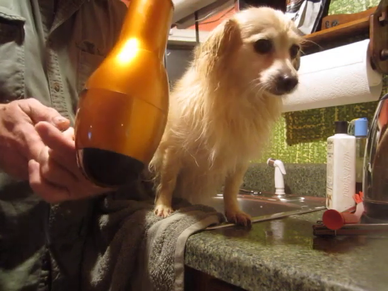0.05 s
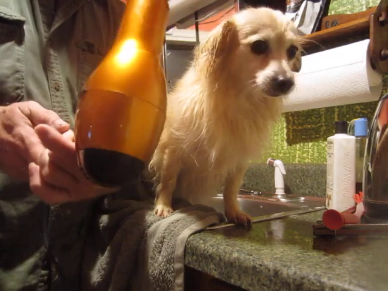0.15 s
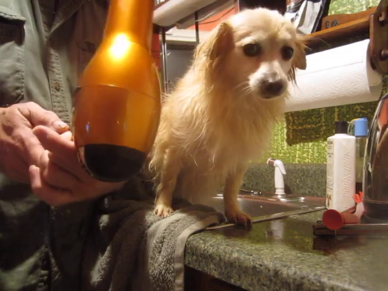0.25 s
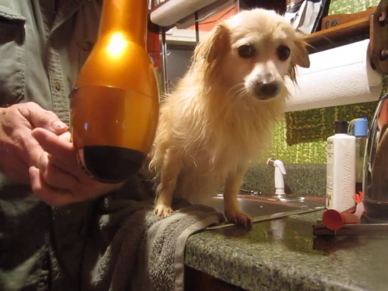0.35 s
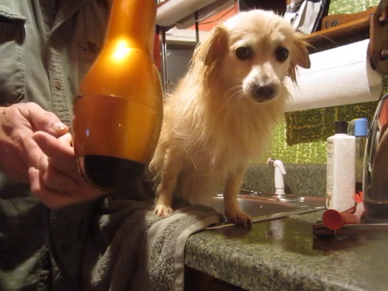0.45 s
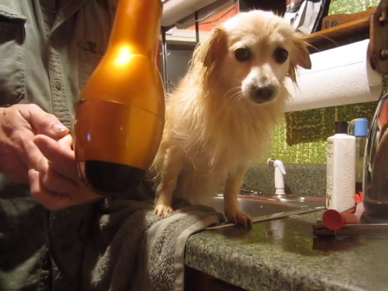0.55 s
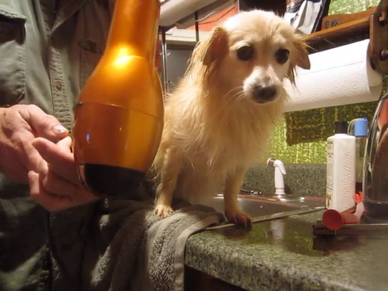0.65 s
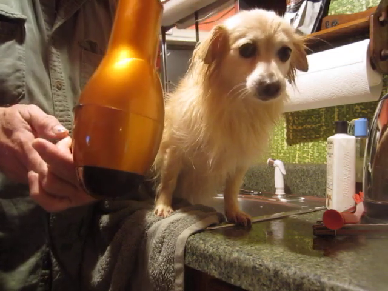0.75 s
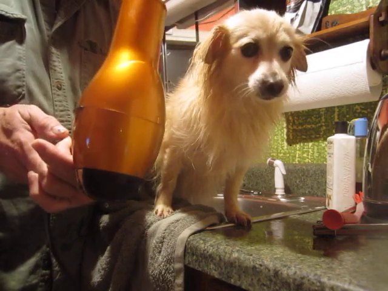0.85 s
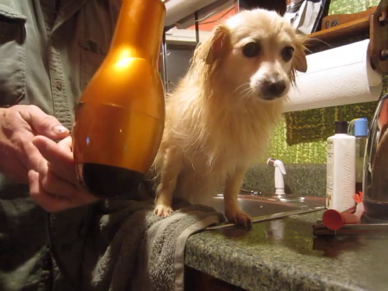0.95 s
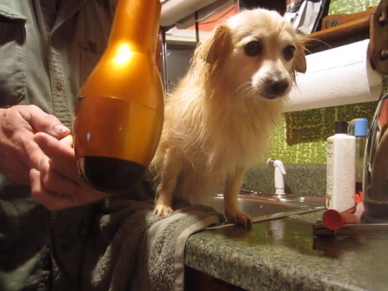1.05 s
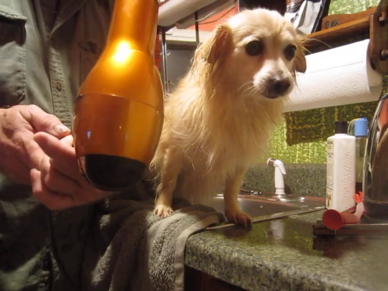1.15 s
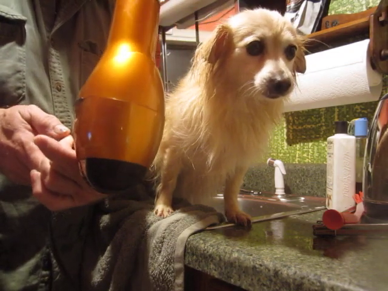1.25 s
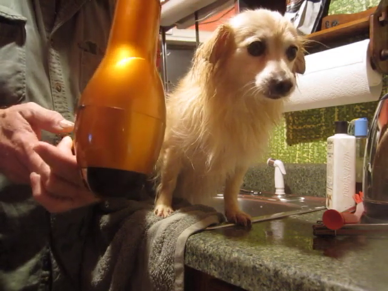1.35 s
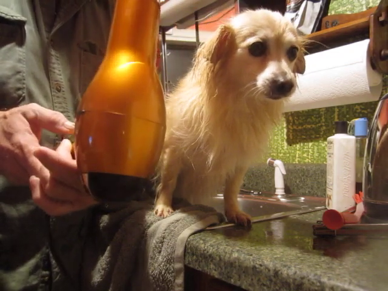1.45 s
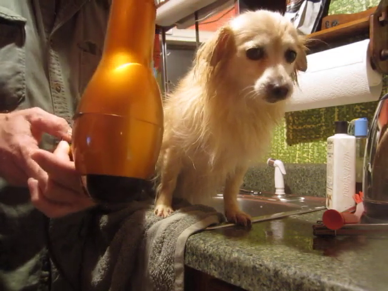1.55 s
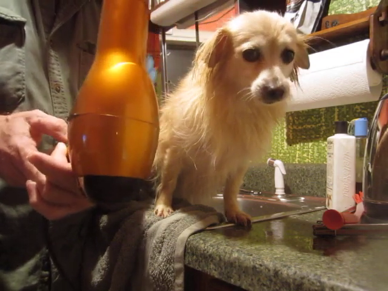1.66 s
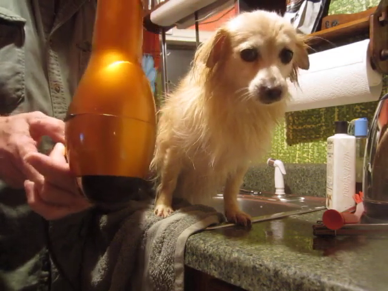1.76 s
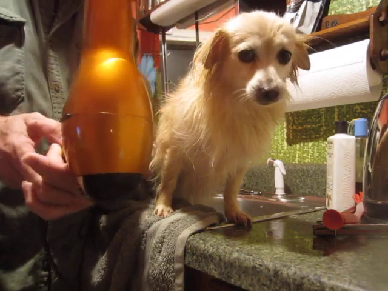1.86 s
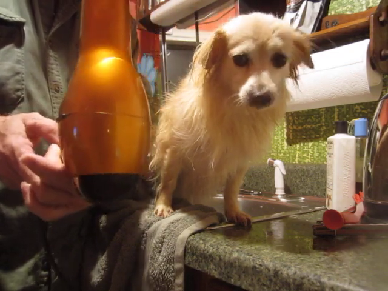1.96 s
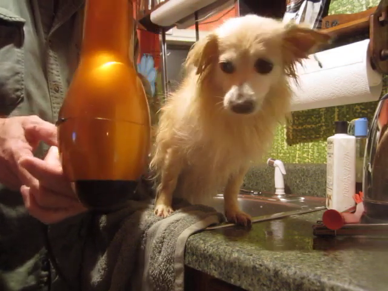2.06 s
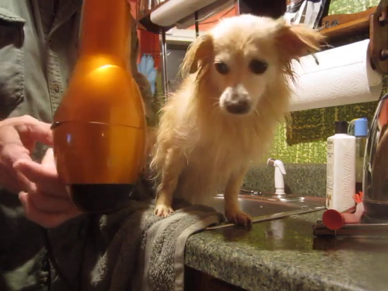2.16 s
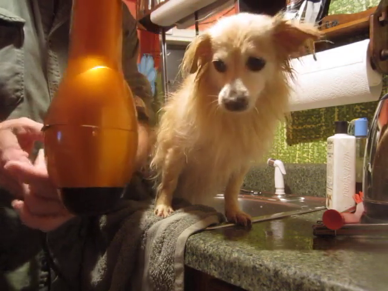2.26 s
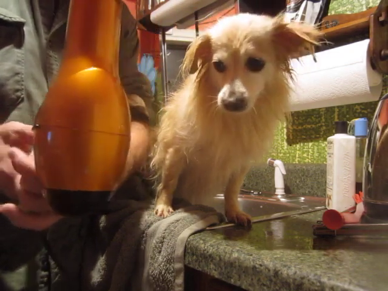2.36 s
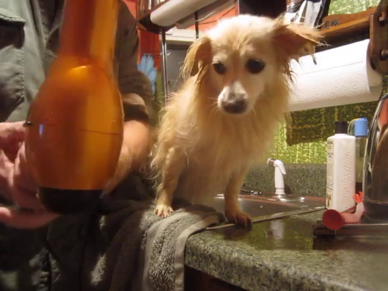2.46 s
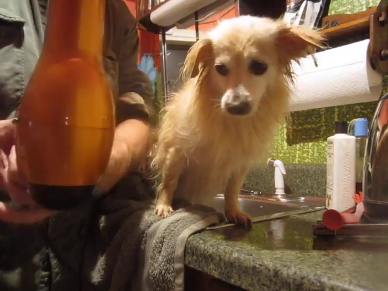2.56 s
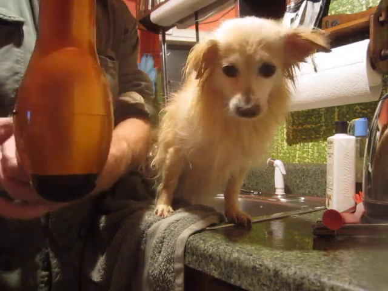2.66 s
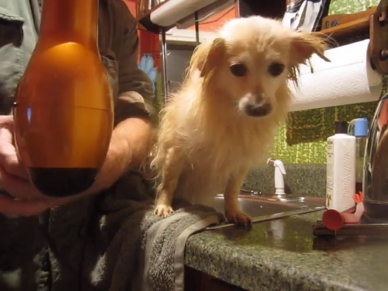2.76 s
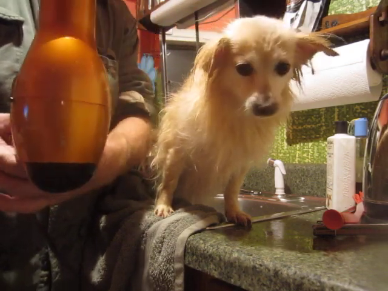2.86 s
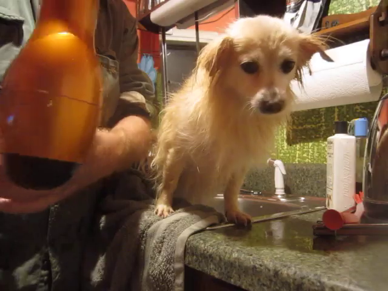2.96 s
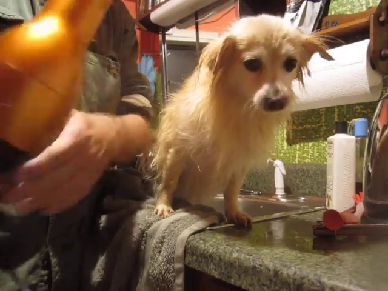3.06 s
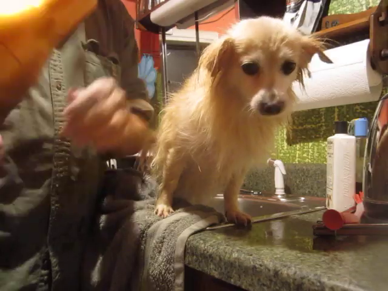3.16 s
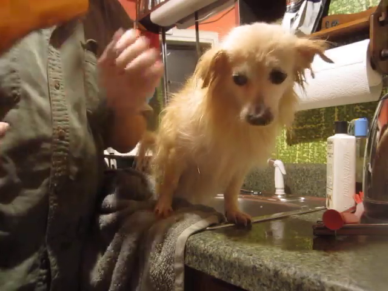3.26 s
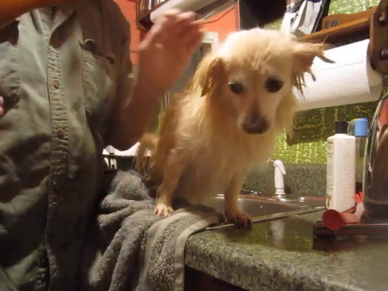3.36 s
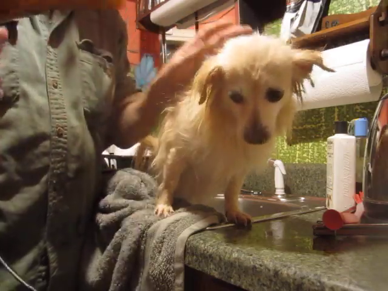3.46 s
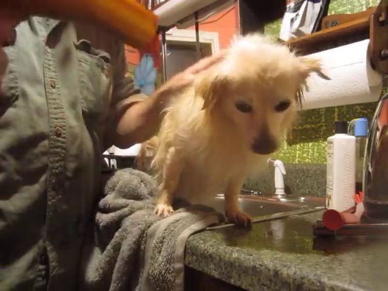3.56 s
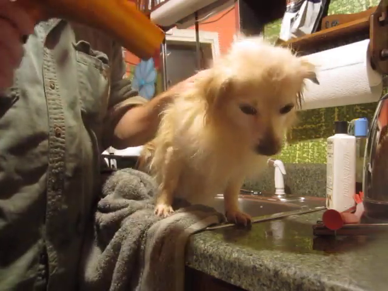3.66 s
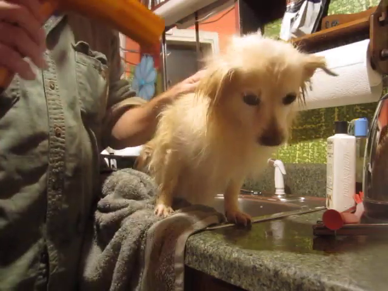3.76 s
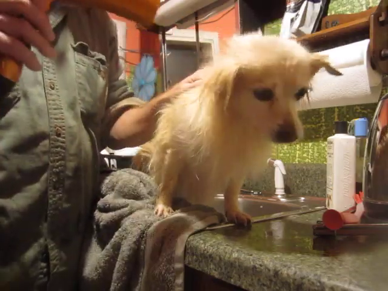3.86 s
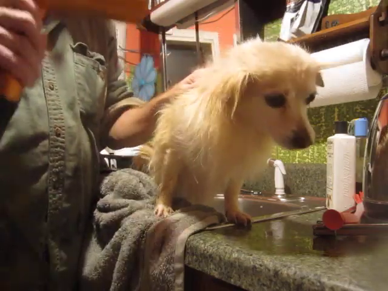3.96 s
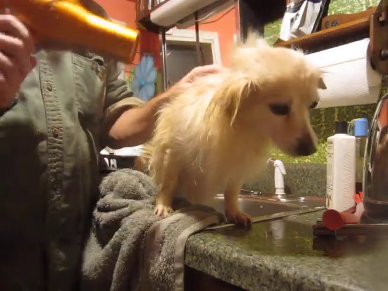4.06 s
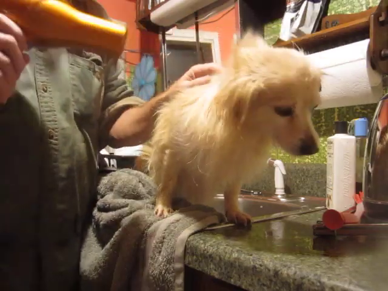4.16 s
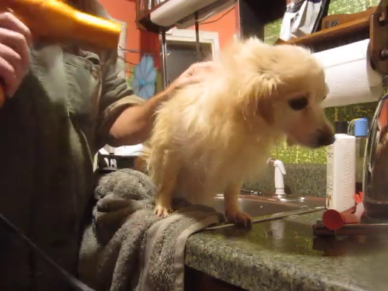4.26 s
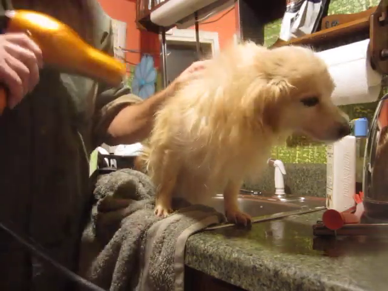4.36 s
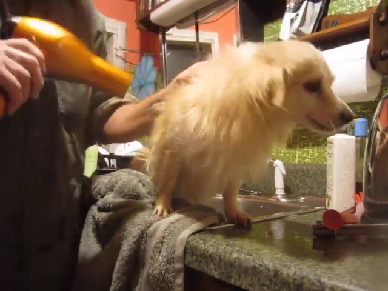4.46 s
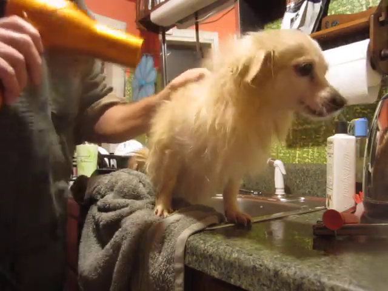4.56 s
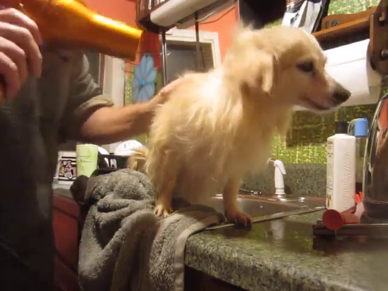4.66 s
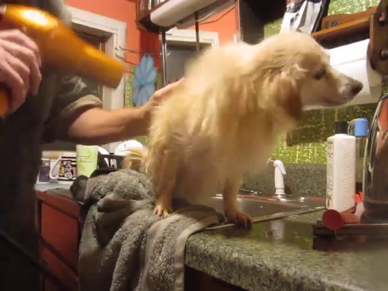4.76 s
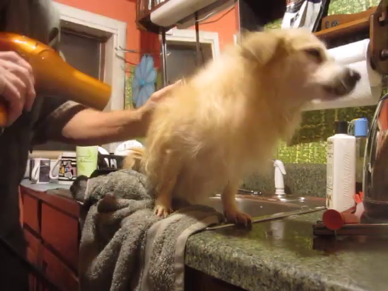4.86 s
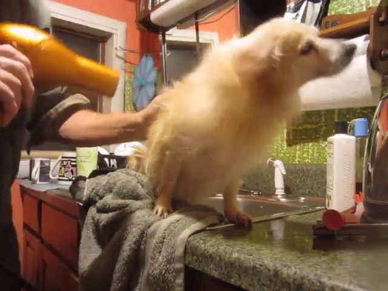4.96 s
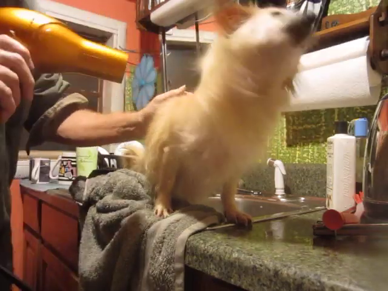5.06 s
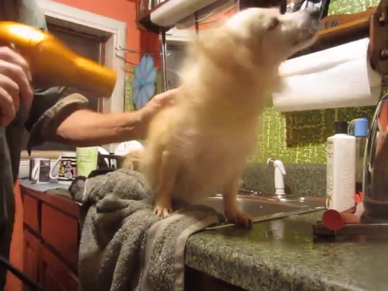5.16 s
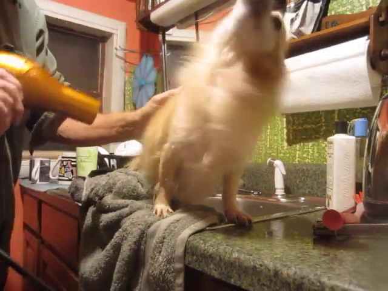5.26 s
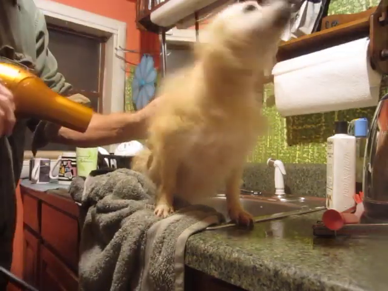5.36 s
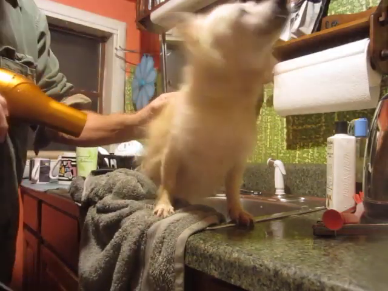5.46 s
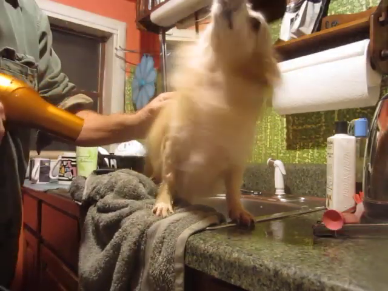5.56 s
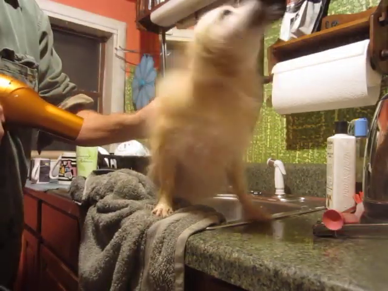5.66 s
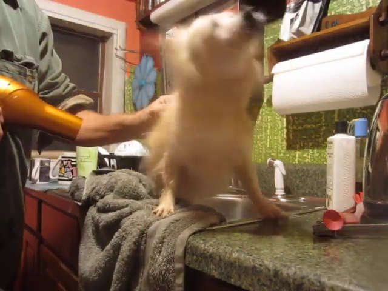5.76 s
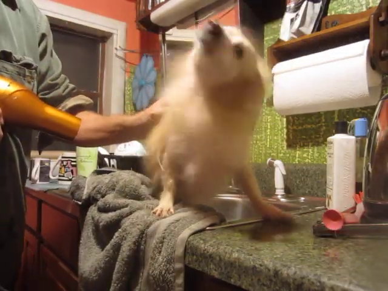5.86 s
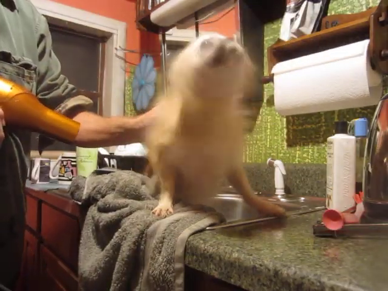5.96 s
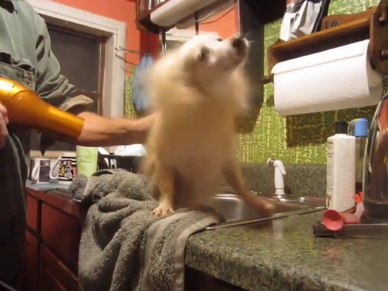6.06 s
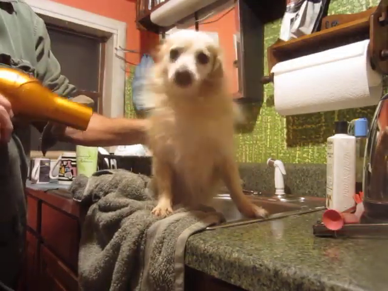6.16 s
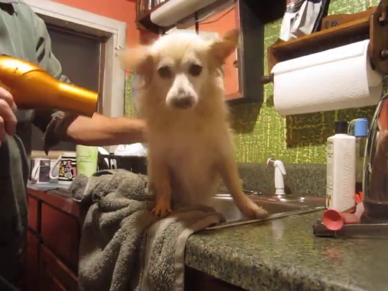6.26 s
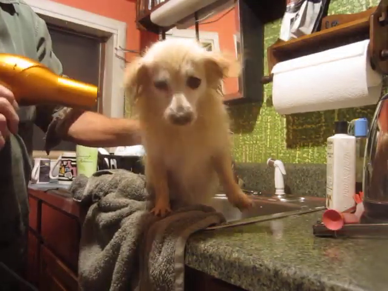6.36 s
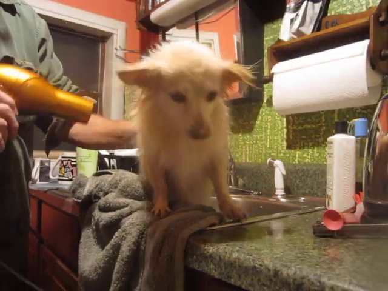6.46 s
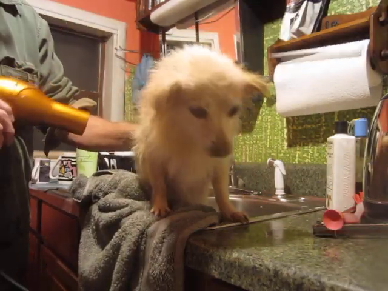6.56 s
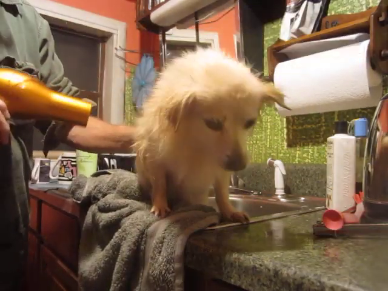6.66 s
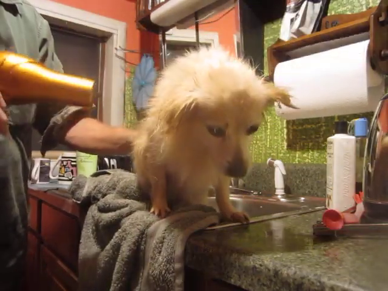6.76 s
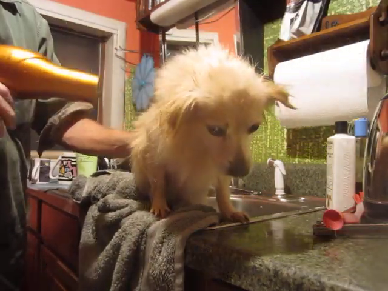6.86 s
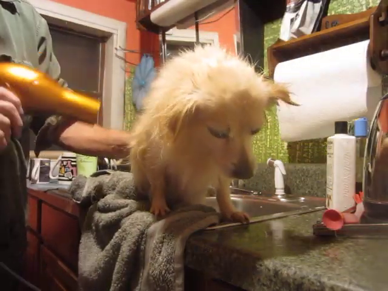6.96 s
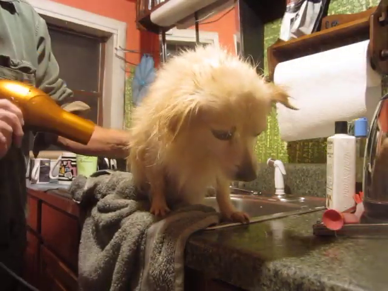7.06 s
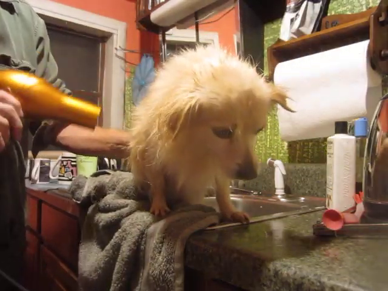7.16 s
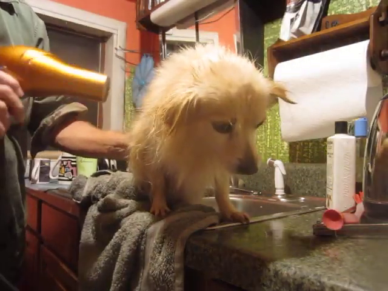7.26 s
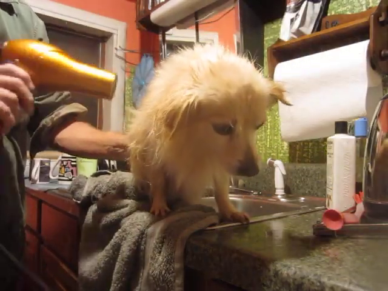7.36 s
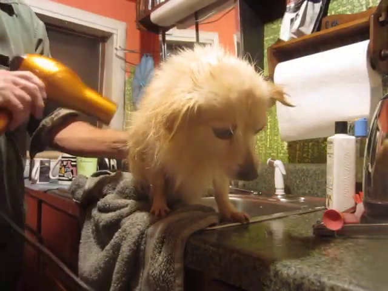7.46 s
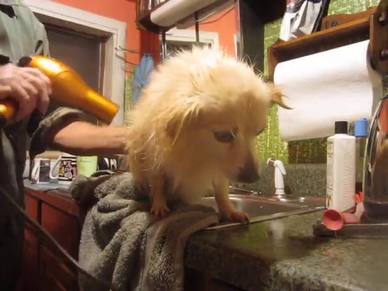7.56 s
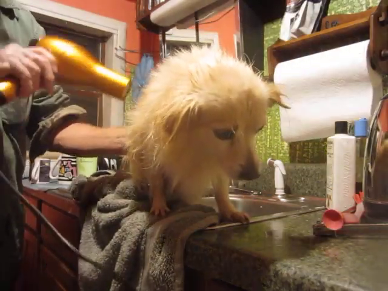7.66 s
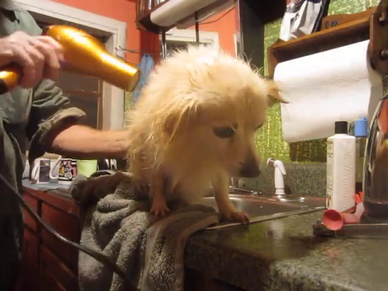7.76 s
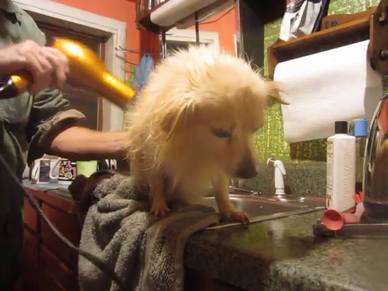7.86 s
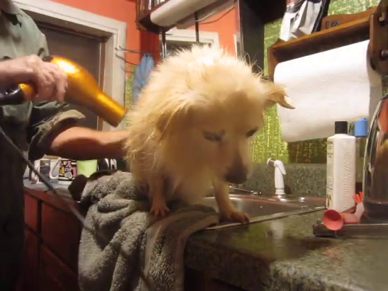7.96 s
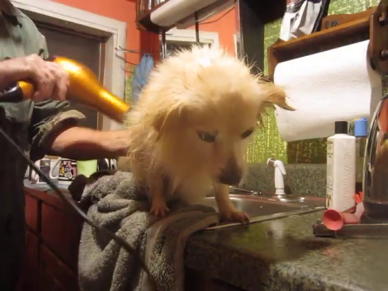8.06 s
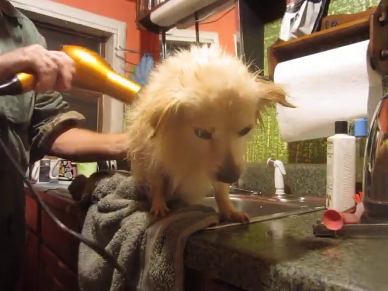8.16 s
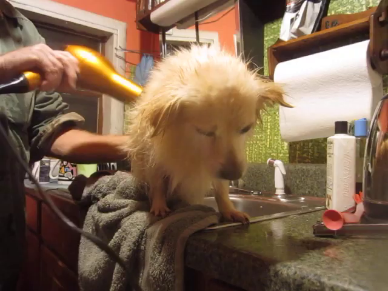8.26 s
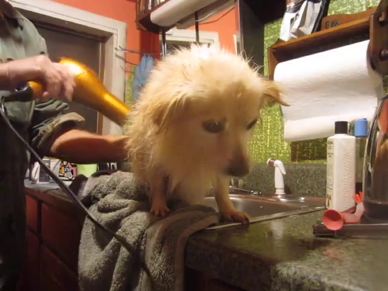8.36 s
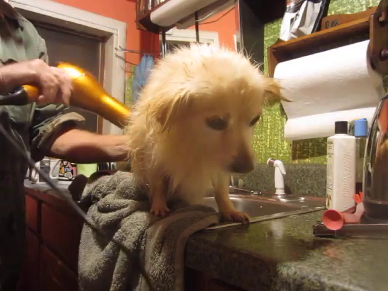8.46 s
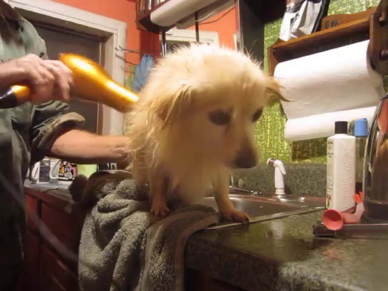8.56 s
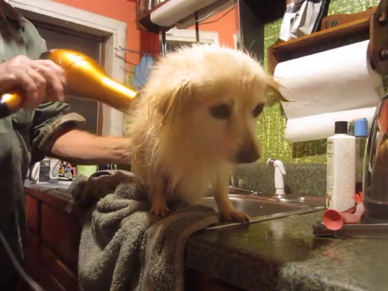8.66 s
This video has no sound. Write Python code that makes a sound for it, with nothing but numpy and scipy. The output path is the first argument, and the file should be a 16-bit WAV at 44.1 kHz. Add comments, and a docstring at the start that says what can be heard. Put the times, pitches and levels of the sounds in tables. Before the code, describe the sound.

A faint appliance hum fills a kitchen for about two seconds. A plastic switch snaps, and a hair dryer close to the microphone starts with a brief buzz and a quickly rising whine. It then runs to the end with a loud, hissing rush of air. The high whine swells and fades, and the roar and a hollow whistle pulse gently as the dryer sweeps over a dog.

```python
"""Drying a wet dog on the kitchen counter

A hair dryer, 0.3 to 0.6 m from the microphone: its switch snaps, the motor buzzes at twice the mains
rate and spins up to a fan whine. Air rushes from the barrel and hoots at the nozzle as it sweeps the dog.
Behind it the kitchen hums and sings faintly, sinking under the camera's gain control as the roar swells."""
import sys
import numpy as np
from scipy import signal
from scipy.fft import rfft, irfft, next_fast_len
from scipy.io import wavfile
from scipy.ndimage import uniform_filter1d, map_coordinates

SR = 44100
rng = np.random.default_rng(int(sys.argv[2]) if len(sys.argv) > 2 else 0)


def transcribe(u):
    """Save the signal u as a 16-bit wav file named by the first command-line argument.

    u: samples, shape (n,) or (channels, n), limited to [-1, 1]; the rate is SR.
    q: integer samples, one column per channel.
    """
    v = np.clip(np.atleast_2d(u).T, -1, 1)
    q = np.round(v * 32767).astype(np.int16)
    wavfile.write(sys.argv[1], SR, q)


N = 384507

POWER_S, TOP_SPEED_HZ = 1.8704, 291.33  # current reaches the motor; full shaft speed
# the dryer is held upright near the microphone, then levelled and drawn back:
# (time [s], distance [m], aim [0 upright, 1 level])
HAND = [(1.9, 0.48, 0.15), (2.4, 0.34, 0), (2.8, 0.39, 0.07), (3.3, 0.32, .02), (3.75, 0.29, 0),
        (4.1, 0.47, 0.05), (5.0, 0.52, 0.48), (5.5, 0.54, 0.8), (6.3, 0.54, 0.93), (7.3, 0.54, 0.8),
        (7.8, 0.58, 0.65), (8.72, 0.5, 0.5)]
# lobes of the fan's whine swing past the microphone:
# (time [s], length [s], blade tone gain [dB], sideband gain [dB], octave gain [dB])
LOBES = [(2.45, 0.52, 9, 4, 4), (2.97, 0.52, 14.5, 8.5, -12), (3.55, 0.13, 6.5, -6, -2),
         (4.2, .25, -7, 11, 1), (4.7, .18, -2, 12, -1), (5.12, .24, 11, 11, -4), (6.37, 0.13, 2, -5, 9),
         (7.72, 0.28, 5, 11, 0), (8.28, 0.23, 11, 6, 3), (8.61, .1, 9, 2, 0)]


def amp(db):
    """Decibels to gain."""
    return 10 ** (np.asarray(db) / 20)


def unit(x):
    """x at rms 1."""
    return x / np.sqrt(np.mean(x ** 2) + 1e-20)


def seconds():
    """The time of every sample."""
    return np.arange(N) / SR


def ramp(start, length):
    """0 before the start, 1 once the length has passed."""
    return np.clip((seconds() - start) / length, 0, 1)


def curves(rows):
    """One value per sample for each column after the time."""
    times, *columns = np.transpose(rows)
    return [np.interp(seconds(), times, column) for column in columns]


def swells(rows):
    """A bell of the given length at half height for each event; one sum per gain column."""
    times, lengths, *gains = np.transpose(rows)
    bells = 0.5 ** ((2 * (seconds() - times[:, None]) / lengths[:, None]) ** 2)
    return np.array(gains) @ bells


def wobble(rate):
    """A smooth random curve, rate knots a second."""
    knots = rng.standard_normal(int(N * rate / SR) + 4)
    grid = np.arange(0, len(knots) - 1, 1 / 16)
    return np.interp(seconds() * rate, grid, map_coordinates(knots, [grid]))


def lagged(x, lag_s):
    """x followed with a time constant."""
    keep = np.exp(-1 / (lag_s * SR))
    return signal.lfilter([1 - keep], [1, -keep], x)


def filtered(x, response):
    """x through a gain that depends on frequency."""
    size = next_fast_len(N + 8192)
    return irfft(rfft(x, size) * response(np.fft.rfftfreq(size, 1 / SR)), size)[..., :N]


def noise(spectrum):
    """Noise of rms 1 coloured by (frequency [Hz], density [dB]) points."""
    hz, db = np.transpose(spectrum)
    colour = lambda f: amp(np.interp(np.log(f + 1), np.log(hz), db))
    return unit(filtered(rng.standard_normal(N), colour))


def phase(hz):
    """Running angle of a gliding frequency."""
    return 2 * np.pi * np.cumsum(hz) / SR


def kitchen(hum_db=1.2, singing_db=0.7, room_db=-46.5):
    """The room tone: appliance hum, a wavering high singing and soft noise."""
    hum_tones = [(59.2, -55.5), (107.7, -53.5), (215.3, -57.5), (279.9, -52.5), (387.6, -58), (538.3, -65),
                 (699.8, -68), (769.8, -66), (818.3, -66.5), (1588, -67)]  # appliances: (frequency [Hz], relative level [dB])
    peaks = [(3466, 56, -57), (3660, 59, -56.5), (4260, 25, -65.5), (4740, 200, -70), (4974, 30, -73),
             (5940, 85, -63.5), (7068, 50, -67), (8010, 79, -62.5), (8100, 140, -61.5), (9200, 100, -83),
             (10430, 150, -77)]  # high singing: (frequency [Hz], width [Hz], relative level [dB])
    room_colour = [(15, -12), (50, -13), (100, -2.5), (150, -11.5), (190, 2), (245, -8), (350, -2),
                   (470, -4.5), (600, -8), (1400, -18.5), (2400, -24), (3500, -19), (5500, -26),
                   (8200, -26.5), (11500, -37.5), (15700, -42)]  # noise floor: (frequency [Hz], density [dB])
    hum = np.zeros(N)
    for hz, db in hum_tones:
        gain = np.sqrt(2) * amp(db + 1.4 * wobble(4))
        hum += gain * np.sin(2 * np.pi * (hz * seconds() + rng.uniform()))
    resonances = lambda f: np.sqrt(sum(amp(2 * db) / width / (1 + (2 * (f - hz) / width) ** 2) ** 2
                                       for hz, width, db in peaks))
    singing = np.sqrt(2 * SR / np.pi) * filtered(rng.standard_normal(N), resonances)
    return amp(hum_db) * hum + amp(singing_db) * singing + amp(room_db) * noise(room_colour)


def switch(t60=0.0058, room_db=-19, room_t60=0.18, ring_hz=2950, ring_t60=0.0065):
    """Plastic snaps that ring the rocker, each with a short answer from the kitchen."""
    contacts = [(1.8526, -13.5), (1.875, -15.5), (1.8778, -15), (1.8825, -28)]  # snaps: (time [s], relative level [dB])
    snap_colour = [(200, -25), (900, -7), (1700, -2), (2200, -13), (2900, 5), (3700, -5), (5000, -7),
                   (6500, -6), (8000, -6), (12000, -15), (16000, -25)]  # struck plastic: (frequency [Hz], density [dB])
    out = np.zeros(N)
    for start, db in contacts:
        t = np.maximum(seconds() - start, 0)
        attack = 1 - np.exp(-t / 0.00053)
        decay = amp(-60 * t / t60) + amp(room_db - 60 * t / room_t60)
        ring = amp(-60 * t / ring_t60) * np.sin(2 * np.pi * ring_hz * t)
        out += amp(db) * (amp(4) * attack * decay * noise(snap_colour) + ring)
    return out


def starting_buzz(level_db=-22, mains_hz=60, rise_s=0.045, hold_s=0.34, fall_db_per_s=60):
    """Each half wave of the mains jolts the housing; the buzz fades after a short hold."""
    housing_colour = [(150, -41), (380, -15), (560, 7), (750, 0), (1000, -7), (1600, -2), (1900, -11),
                      (2150, -2.5), (2700, -7), (3600, -17), (8000, -17), (16000, -46)]  # jolted shell: (frequency [Hz], density [dB])
    t = seconds() - POWER_S
    since_jolt = t % (0.5 / mains_hz)
    jolts = unit(np.exp(-since_jolt / 0.0029) * (1 - np.exp(-since_jolt / 0.0021)))
    rise_db = -6 * (1 - ramp(POWER_S, rise_s))
    fall_db = fall_db_per_s * np.maximum(t - hold_s, 0)
    return (t > 0) * amp(level_db + rise_db - fall_db) * jolts * noise(housing_colour)


def shaft_speed(start_s=1.8404, spin_up_s=0.13475, creep_hz=5.75, creep_s=3.42):
    """Turns per second: the motor spins up from rest, then creeps a little faster as it warms."""
    t = np.maximum(seconds() - start_s, 0)
    spin_up = TOP_SPEED_HZ * (1 - np.exp(-t / spin_up_s))
    return np.maximum(spin_up - creep_hz * np.exp(-t / creep_s), 1)


def whoop(speed, per_turn=3.12, resonance_hz=600, width_hz=85, level_db=-17, jitter=0.056):
    """A short, rough rising tone as the rotor's vibration sweeps through the housing's resonance."""
    hz = per_turn * speed
    response = 1 / (1 + ((hz - resonance_hz) / width_hz) ** 4)
    rough_gain = np.sqrt(2) * amp(level_db + wobble(120))
    return response * rough_gain * np.sin(phase(hz * (1 + jitter * wobble(200))))


def blown(flow, level_db, power, turned_db, turn_s=3.4, turn_length_s=0.76):
    """Gain of an air sound: a power of the flow, changed once the nozzle has turned onto the dog."""
    return flow ** power * amp(level_db + turned_db * ramp(turn_s, turn_length_s))


def fan(speed, flow, flutter_db=0.75, drift_db=1.0):
    """Nine blades on an unbalanced shaft; turbulence flutters each tone, and the high ones are beamed."""
    orders = [1, 9, 10, 18]  # imbalance, blade tone, upper sideband, octave: [cycles per turn]
    laws = [(-34, 9.1, 0.5), (-29, 0.37, 0), (-34, 3, -2.5), (-33, 1.5, -1)]  # each tone's strength: (level [dB], power of the flow, change on turning [dB])
    angle = phase(speed * (1 + 0.0011 * wobble(30) + 0.000592 * wobble(2)))
    tones = []
    for order, law, beam_db in zip(orders, laws, [0, *swells(LOBES)]):
        waver = amp(beam_db + flutter_db * wobble(22) + drift_db * wobble(3.9))
        tones.append(blown(flow, *law) * waver * np.sin(order * angle))
    tones[1] *= amp(np.interp(speed, [240, 284], [3, 0]))  # stronger while straining against slow air
    bite = np.minimum(speed / 200, 1) ** 4  # slow blades hardly sound
    return np.sqrt(2) * bite * sum(tones)


def hoot(flow, sweep_db, width_hz=17):
    """The jet rings a narrow hoot that rises with the flow and wanders between about 840 and 1000 Hz."""
    pitches = [(2.7, 840), (3.1, 940), (3.85, 942), (4.45, 996), (4.95, 986), (5.2, 897), (7.38, 901),
               (7.55, 988), (8.72, 1003)]  # nozzle resonance: (time [s], pitch at full speed [Hz])
    angle = phase(flow * curves(pitches)[0])
    turbulence = filtered(rng.standard_normal((2, N)), lambda f: 1 / (1 + (f / width_hz) ** 2))
    tone = unit(turbulence[0] * np.cos(angle) + turbulence[1] * np.sin(angle))
    return blown(flow, level_db=-23.5, power=3.7, turned_db=1) * amp(sweep_db) * tone


def patchy(x, depth_db):
    """The colour shifts in soft patches, several hundred Hz wide and a few tenths of a second long."""
    spectra = signal.stft(x, nperseg=512)[2]
    patches = rng.standard_normal(spectra.shape)
    for _ in range(2):
        patches = uniform_filter1d(uniform_filter1d(patches, size=7, axis=0), size=36, axis=1)
    return signal.istft(spectra * amp(depth_db * unit(patches)), nperseg=512)[1][:N]


def reflected(x, share, sway_ms):
    """Counter and cupboards send the microphone copies whose delays drift as the hand moves."""
    paths_ms = [.9, 2.3, 3.7, 6.1]  # reflections: extra travel time [ms]
    n = np.arange(N)
    copies = [np.interp(n - (ms + sway_ms * wobble(1.5)) * SR / 1000, n, x) for ms in paths_ms]
    return (x + share * sum(copies)) / np.sqrt(1 + len(copies) * share ** 2)


def air(flow, sweep_db, fur_share=0.73, dip_share=0.29, swish_share=0.73):
    """The stream roars, rushes, hisses and ruffles the fur; the treble dips as sweeps swell the roar."""
    # colours of the stream, all (frequency [Hz], density [dB])
    upright_colour = [(200, -63), (390, -11.5), (460, -10.5), (520, -3.5), (620, 1.5), (730, 3),
                      (800, -1.5), (960, 2), (1080, -2.5), (1180, 0.5), (1350, -13), (1800, -10.5),
                      (3000, -46)]  # barrel held upright
    aimed_colour = [(200, -41), (380, -16), (440, 0.5), (500, -4.5), (570, -5), (630, -1), (730, 1),
                    (810, -3), (960, 2.5), (1200, 0), (1310, -5.5), (1420, -3.5), (1800, -13.5),
                    (3000, -35)]  # barrel levelled at the dog
    fur_colour = [(30, -20), (120, -13.5), (200, -1), (330, 3), (420, 0.5), (700, -28), (1500, -70)]  # jet on the coat
    rush_colour = [(700, -50), (1300, 0), (1600, 0), (1900, -1), (2250, 1), (2480, -2), (2850, 0),
                   (3300, 0), (3700, -2.5), (4400, -5.5), (5200, -13.5), (8000, -61)]  # grille
    hiss_colour = [(3000, -48), (4400, -2.5), (5000, -3.5), (5700, -1), (6600, -1.5), (7400, -3.5),
                   (8200, -5), (9500, -19.5), (13000, -45)]  # treble
    fizz_colour = [(6000, -40), (7800, -3.5), (9000, 1), (11000, -.5), (12200, -3.5), (13300, -5.5),
                   (15100, -14.5), (15700, -13)]  # top octave
    swish_colour = [(4500, -38), (5900, -5), (6500, 0), (7100, -7), (9000, -40)]  # edge of the intake
    aim = np.clip(curves(HAND)[1], 0, 1)
    barrel = np.sqrt(1 - aim) * noise(upright_colour) + np.sqrt(aim) * noise(aimed_colour)
    fur = blown(flow, level_db=-38, power=2.1, turned_db=5) * noise(fur_colour)
    fur *= amp(fur_share * sweep_db)
    roar = blown(flow, level_db=-12, power=2.6, turned_db=-2) * barrel
    roar *= amp(sweep_db + 0.35 * wobble(25))
    rush = blown(flow, level_db=-14, power=2.3, turned_db=0.28) * noise(rush_colour)
    hiss = blown(flow, level_db=-19, power=2.7, turned_db=0.8) * noise(hiss_colour)
    fizz = blown(flow, level_db=-20, power=2.1, turned_db=-0.55) * noise(fizz_colour)
    swish = blown(flow, level_db=-39, power=2, turned_db=6) * noise(swish_colour)
    swish *= amp(swish_share * swells(LOBES)[1])  # swells with the fan's sideband
    flicker = amp(0.37 * wobble(30))
    treble = amp(-dip_share * sweep_db) * (rush + flicker * (hiss + fizz + swish))
    return fur + reflected(roar + patchy(treble, depth_db=0.67), share=0.17, sway_ms=0.302)


def scene(closest_m=0.29):
    """Motor speed drives the dryer, louder when nearer the microphone; both channels are alike."""
    # the jet sweeps across the dog: (time [s], length [s], roar gain [dB], hoot gain [dB])
    sweeps = [(3.75, 0.65, 0.5, 5.5), (4.47, 0.32, 4.5, -1), (4.92, 0.22, 5, -1.5), (5.36, 0.26, 4, 1),
              (5.67, 0.26, 3.5, 6), (6.04, 0.45, 3.5, 9.5), (6.62, 0.24, 4, 9), (7.17, 0.27, 3, 7.5),
              (7.62, 0.15, 1.5, 2.5), (8.08, 0.75, 0, 6), (8.55, .16, 0.5, 3)]
    roar_db, hoot_db = swells(sweeps)
    speed = shaft_speed()
    flow = speed / TOP_SPEED_HZ
    nearness = closest_m / curves(HAND)[0]
    blowing = nearness * (air(flow, roar_db) + hoot(flow, hoot_db) + fan(speed, flow))
    dryer = ramp(POWER_S, 0.022) * (blowing + whoop(speed)) + starting_buzz() + switch()
    mono = dryer + kitchen()
    return np.array([mono, mono])


def record(dry, threshold_db=-24, slope=0.77, sense_s=0.0051, glide_s=0.12, top_hz=15750):
    """The camera turns its gain down under loud sound and keeps nothing above its band limit."""
    level_db = 10 * np.log10(lagged(dry[0] ** 2, sense_s) + 1e-12)
    cut_db = lagged(slope * np.maximum(level_db - threshold_db, 0), glide_s)
    return filtered(dry * amp(-cut_db), lambda hz: hz < top_hz)


dry = scene()
out = record(dry)
transcribe(out)
```